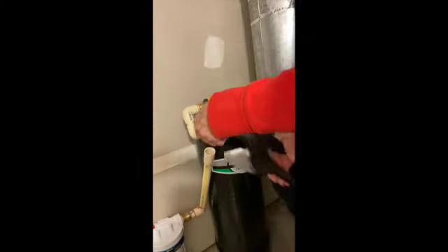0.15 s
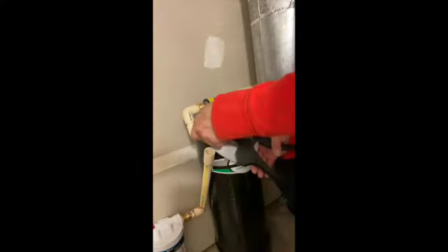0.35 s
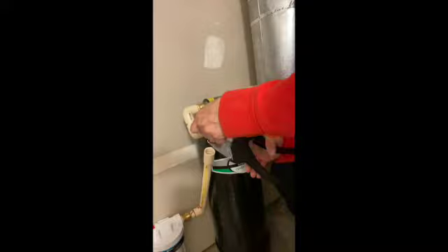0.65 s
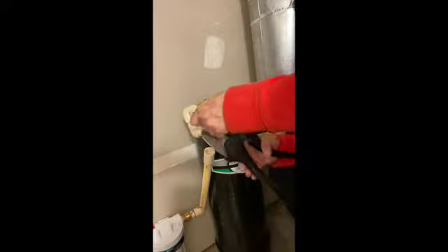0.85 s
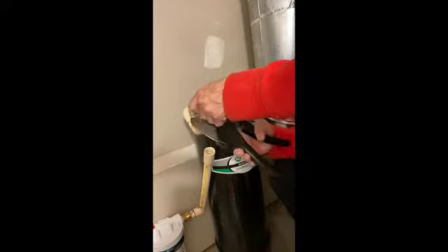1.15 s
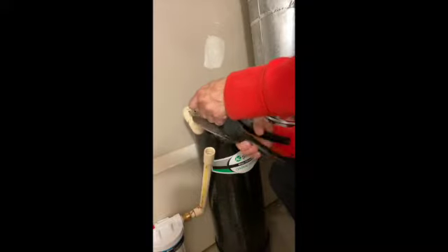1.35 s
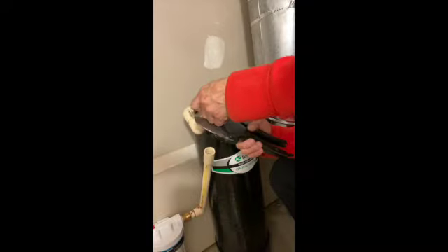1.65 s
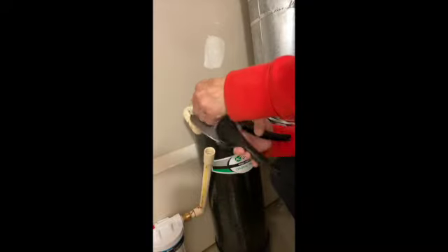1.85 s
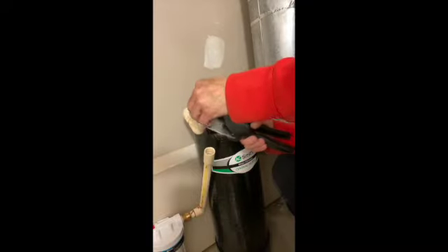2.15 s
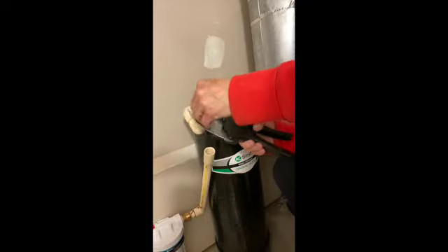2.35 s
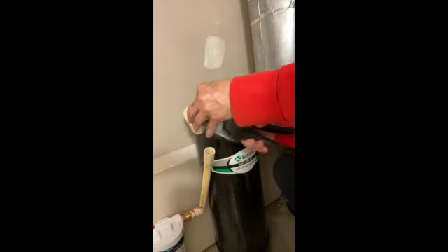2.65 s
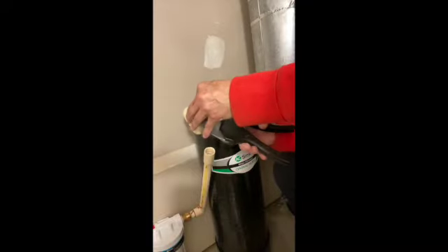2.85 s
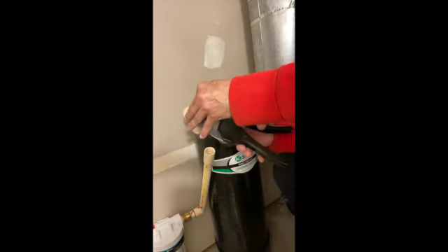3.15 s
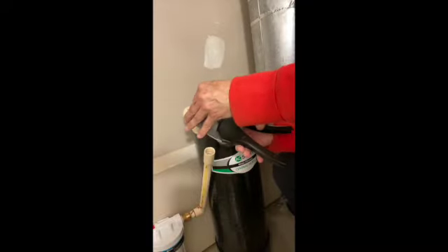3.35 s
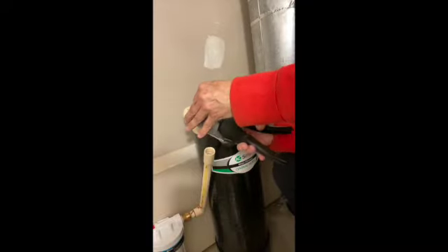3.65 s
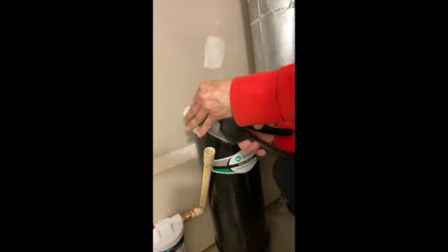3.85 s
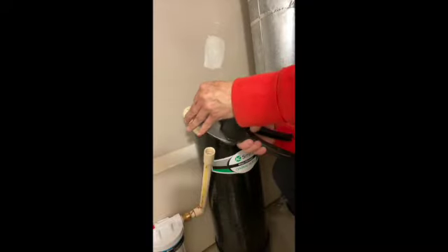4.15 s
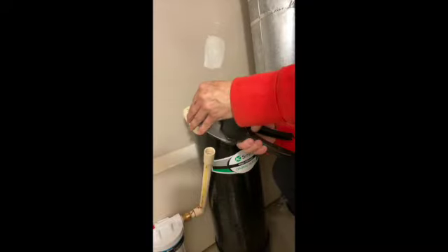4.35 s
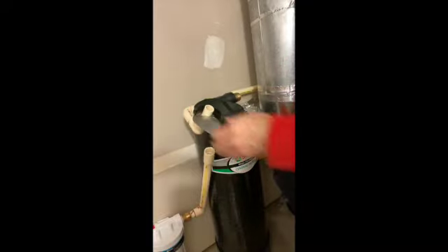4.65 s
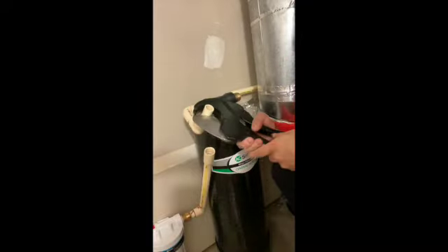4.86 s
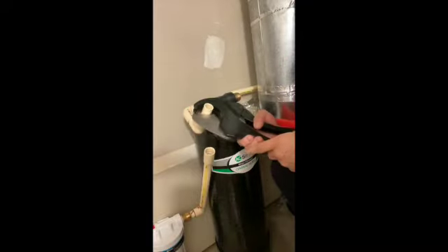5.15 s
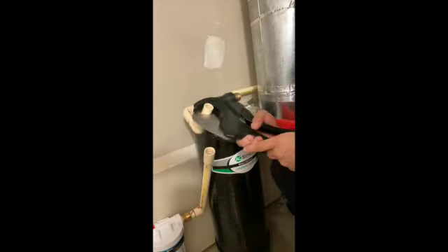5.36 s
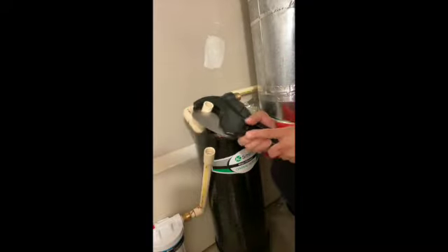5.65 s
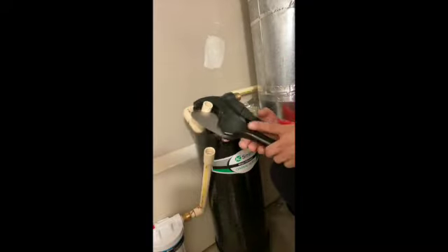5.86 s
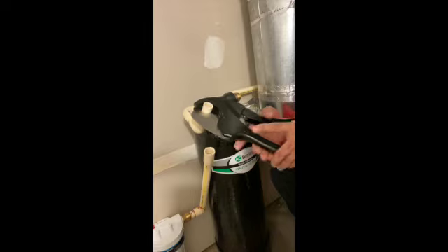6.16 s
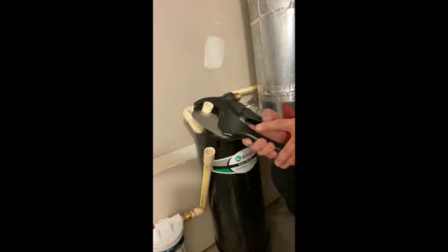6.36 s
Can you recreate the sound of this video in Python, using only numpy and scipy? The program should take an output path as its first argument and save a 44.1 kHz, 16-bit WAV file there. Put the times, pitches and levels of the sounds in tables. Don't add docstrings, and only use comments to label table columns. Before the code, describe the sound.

A close, dry stereo pickup in a small utility room, work slightly right, over very faint low mains hum, rumble and air. At about 0.37 s the tool clacks on the pipe and a soft low boom comes from the tank; tiny ticks follow. Light taps at 1.7 lead around a ratchet run: a light snap at 1.5, a strong one at 1.8, a duller one at 2.2 and a strong brighter one at 2.7, each a sharp steel crack with short ringing and slight hollow knock. Rustles and taps fill between. Around 3.3 the plastic gives a short, rough creak. Soft pats and nudges at 3.5-4.0, then near quiet, with faint palm slides from 4.6 to 5.2. A bright snap at 5.5 has a dry pop just after; a last, brightest snap at 5.95 follows a longer scraping drag. Rustle and small taps continue to 6.3.

```python
import sys
import numpy as np
from scipy import signal
from scipy.fft import rfft, irfft, next_fast_len
from scipy.io import wavfile
from scipy.ndimage import map_coordinates

SR = 44100
rng = np.random.default_rng(int(sys.argv[2]) if len(sys.argv) > 2 else 0)


def elevation(decibels):
    levels = np.asarray(decibels, float)
    return 10 ** (levels / 20)


def store_wav(level_fs):
    pcm = np.round(np.clip(np.atleast_2d(level_fs), -1, 1) * 32767)
    wavfile.write(sys.argv[1], SR, pcm.T.astype(np.int16))


N = 286650
TIME = np.arange(N) / SR

# (time [s], peak [dB], die-away by 60 dB [s], drag up the tooth [s],
# brightness as the grip tightens [dB per octave])
SNAPS = [
    (1.5129, -19, 0.092, 0.0043, -4),
    (1.788, -8.5, 0.07, 0.0091, -3),
    (2.1849, -18, 0.1, .009, -0.5),
    (2.7075, -8, 0.09, 0.015, 3.5),
    (5.5364, -13.5, 0.1, 0.015, 4),
    (5.9514, -10.5, 0.089, 0.029, 5),
]
# (frequency [Hz], level [dB])
SCUFF = [(3000, -27), (4300, -2), (5500, -2.5), (7500, 1), (9000, -2), (12000, -6.5), (14200, -6),
         (15700, -45)]


def unit(x):
    return x / np.sqrt(np.mean(x ** 2) + 1e-20)


def along(points, hz):
    f, v = np.transpose(points)
    return np.interp(np.log(hz + 1), np.log(f + 1), v)


def wobble(rate):
    knots = rng.standard_normal(int(N * rate / SR) + 4)
    return map_coordinates(knots, [np.arange(N) * rate / SR])


def filtered(x, response):
    m = next_fast_len(x.shape[-1] + 8192)
    gain = response(np.fft.rfftfreq(m, 1 / SR))
    gain = unit(np.abs(gain)) * np.exp(1j * np.angle(gain))
    return irfft(rfft(x, m) * gain, m)[..., :x.shape[-1]]


def body(modes):
    def response(f):
        total = 0
        for k, (hz, width, db) in enumerate(modes):
            total = total + (-1) ** k * elevation(db) * 1j * f * width / (hz * hz - f * f + 1j * f * width)
        return total
    return response


def shape(points):
    return lambda f: elevation(along(points, f))


def diffuse(spectrum):
    # (frequency [Hz], likeness of the ports [0 to 1])
    likeness = [(100, 0.94), (400, 0.54), (1500, 0.15), (8000, 0.91)]
    m = next_fast_len(N)
    f = np.fft.rfftfreq(m, 1 / SR)
    angle = np.arccos(np.clip(along(likeness, f), -1, 1)) / 2
    noise = rfft(rng.standard_normal((2, m))) * elevation(along(spectrum, f))
    mid, side = irfft(noise * [np.cos(angle), np.sin(angle)], m)[:, :N]
    return unit(np.array([mid + side, mid - side]))


def strokes(rows, rise, fall):
    power = 0
    for s, hold, db in rows:
        before, after = np.maximum(s - TIME, 0), np.maximum(TIME - s - hold, 0)
        power = power + elevation(2 * (db - rise * before - fall * after))
    return np.sqrt(power)


def rattle(t60, roughness_db, apart):
    t = np.arange(SR // 4) / SR
    lumps = np.interp(t, np.arange(250) / 1000, rng.standard_normal(250)) * np.minimum(t / .004, 1)
    both, own = rng.standard_normal((2, len(t)))
    force = both + apart * own * [[1], [-1]]
    return force * elevation(roughness_db * lumps - 60 * t / np.clip(t60, .02, .4))


def ringing(modes, rise):
    t = np.arange(SR // 2) / SR
    total = 0
    for hz, db, t60 in modes:
        phase = 0.25 * rng.standard_normal((2, 1))
        level = elevation(db - 60 * t / t60 + 2.5 * np.cos(hz / 40 * t))
        total = total + level * np.sin(2 * np.pi * hz * t + phase)
    return (1 - np.exp(-t / rise)) * total


def add(out, at, piece):
    out[..., at:at + piece.shape[-1]] += piece


def touches(rows, treble_db, hollow_db, blade_db):
    # (frequency [Hz], width [Hz], level [dB])
    blade_lines = [(1740, 15, -7), (2930, 24, -3), (3360, 11, -4), (4200, 18, -4)]
    # (frequency [Hz], width [Hz], level [dB])
    hollow = [(298, 9, 4.5), (570, 190, -2.5), (850, 130, -1.5), (1130, 390, -7)]
    out, scuff, pipe = np.zeros((3, 2, N + SR))
    soft = 1 - np.exp(-np.arange(SR // 4) / SR / 0.0013)
    for s, db, hz, t60 in rows:
        at = round(s * SR)
        modes = body([(1550, 350, -7), (hz, 260, 0), (4300, 1400, -12)])
        lines = body([(c, w, g + blade_db + rng.normal(0, 4)) for c, w, g in blade_lines])

        def wall(f):
            return (modes(f) + lines(f)) / (1 + 1j * f / (3.0 * hz)) ** 2 / (1 + (f / 5000) ** 8)

        force = soft * rattle(t60, roughness_db=0.0, apart=0.74)
        add(out, at, elevation(db - 10.0) * filtered(force, wall))
        hiss = soft * rattle(1.2 * t60, roughness_db=2.0, apart=.1)
        add(scuff, at, elevation(db + treble_db - 3.0) * hiss)
        knock = soft * rattle(0.77 * t60, roughness_db=3, apart=.2)
        add(pipe, at, elevation(db + hollow_db + 2.0) * knock)
    return (out + filtered(scuff, shape(SCUFF)) + filtered(pipe, body(hollow)))[:, :N]


def thumps(rows, excess):
    out, t = np.zeros(N + SR), np.arange(SR // 2) / SR
    for s, db, hz, t60, rise in rows:
        turns = hz * (t + excess * .006 * (1 - np.exp(-t / 0.0053)))
        swell = (1 - np.exp(-t / rise)) ** 2
        add(out, round(s * SR), elevation(db - 60 * t / t60) * swell * np.sin(2 * np.pi * turns))
    return out[:N]


def swings(rows):
    total = 0
    for s, db, hz, half in rows:
        t = TIME - s
        total = total + elevation(db) * np.exp(-.5 * (t / half) ** 2) * np.sin(2 * np.pi * hz * t)
    return total


def mains_hum():
    # (frequency [Hz], level [dB])
    hum_lines = [(120, -0.5), (240, -31)]
    # (time [s], hum level [dB])
    load = [(0, -74), (.25, -73.5), (.45, -67.5), (1.2, -72.5), (2.6, -64), (3.1, -69), (4.7, -66.5),
            (5.6, -67.5), (6.2, -65), (6.5, -64)]
    s, db = np.transpose(load)
    hum = 0
    for hz, line_db in hum_lines:
        level = elevation(line_db + 2.5 + 1.8 * wobble(6.2))
        hum = hum + level * np.sin(2 * np.pi * hz * TIME + 0.6 * wobble(3.3))
    return elevation(np.interp(TIME, s, db)) * hum


def floor_rumble():
    # (start [s], hold [s], level [dB])
    shifts = [
        (0, 0.011, -71),
        (.42, 0.034, -88),
        (.6, 0.26, -76.5),
        (1.9, 0.93, -72.5),
        (3.9, 1, -74.5),
        (5.5, 0.038, -67.5),
        (6.17, 0.041, -67.5),
    ]
    # (frequency [Hz], level [dB per Hz])
    lows = [(12, -41), (20, -8.5), (92, 0), (123, -16.5), (137, -4), (146, -16.5), (250, -29), (330, -72)]
    level = strokes(shifts, rise=20, fall=64) + elevation(-77.5)
    return level * elevation(2.2 * wobble(4.1)) * diffuse(lows)


def end_fade():
    return elevation(-164.5 * np.maximum(TIME - 6.41, 0))


def room_air():
    # (frequency [Hz], level [dB])
    air_colour = [(110, -21), (165, 1.5), (700, -10), (1300, -16.5), (2200, -12.5), (6000, -22.5),
                  (13500, -22.5), (15500, -46)]
    return elevation(-82) * diffuse(air_colour)


def sleeve():
    # (start [s], hold [s], rub [dB], swish over the rub [dB])
    moves = [(0, 0.083, -87.5, -1), (1.57, 0.12, -80, 5), (1.84, 0.089, -75.5, 8), (2.047, 0.22, -70, -10),
             (2.434, 0.014, -75, 1.5), (2.556, 0.025, -65, -5), (2.692, 0.094, -83, -7),
             (3.6, 0.0111, -84, -15.5), (3.894, 0.0124, -72.5, -5.5), (4.05, 0.32, -105, -3),
             (4.421, 0.065, -88.5, 11.5), (4.589, 0.12, -88, -5), (4.794, 0.22, -76.5, -0.5),
             (5.122, 0.12, -89.5, -4), (5.329, 0.0089, -66, -11), (5.45, 0.28, -84.5, 8),
             (5.776, 0.0093, -66, 2), (5.874, 0.069, -67, 1.5), (5.997, 0.26, -70.5, -2.5),
             (6.246, 0.036, -86, -8)]
    # (frequency [Hz], level [dB per Hz])
    cloth = [(250, -15.5), (500, -1.5), (1400, -3.5), (3000, -1.5), (5500, -7.5), (8000, -43)]
    rise, fall = 410, 430
    grain = elevation(1.5 * wobble(25) + 3 * wobble(400))
    rub = strokes([row[:3] for row in moves], rise, fall) + elevation(-99)
    swish = strokes([(s, hold, db + over) for s, hold, db, over in moves], rise, fall) + elevation(-95.5)
    soft_rub = rub * filtered(unit(grain * rng.standard_normal(N)), shape(cloth))
    bright_swish = swish * elevation(1.4 * wobble(23)) * filtered(rng.standard_normal(N), shape(SCUFF))
    return soft_rub + bright_swish


def jaw_taps():
    # (time [s], peak [dB], loudest wall resonance [Hz], die-away by 60 dB [s])
    taps = [(.365, -32, 2630, 0.11), (.7172, -45.5, 3400, 0.029), (1.415, -78, 6300, 0.048),
            (1.659, -48, 2500, 0.23), (1.678, -53, 2540, 0.041), (1.7225, -28, 1650, 0.034),
            (1.7255, -27, 2940, 0.09), (2.023, -47, 1470, 0.126), (2.0298, -40.5, 2510, 0.094),
            (2.067, -41, 2430, 0.11), (2.098, -37, 2940, 0.082), (2.4647, -42.5, 2490, 0.073),
            (2.5553, -40.5, 2356, 0.19), (2.682, -36.5, 2597, 0.3), (3.9505, -36.5, 2440, 0.095),
            (4.039, -65, 2200, 0.0426), (5.3233, -47.5, 2320, 0.14), (5.592, -32, 2200, .06),
            (6.2093, -35, 2276, 0.073), (6.217, -37.5, 2680, 0.055), (6.2744, -54.5, 1540, 0.071)]
    return touches(taps, treble_db=-20, hollow_db=-21, blade_db=-13)


def chimes():
    # (time [s], peak [dB], pitch [Hz], die-away by 60 dB [s])
    tones = [(0.366, -51, 1694, 0.12), (.367, -69, 2960, .33), (.367, -61, 4200, 0.24),
             (.368, -58, 880, 0.12), (.368, -62, 680, .12), (0.389, -65, 253, 0.26), (.400, -68, 332, 0.28),
             (0.389, -64.5, 460, 0.16), (0.611, -79, 4500, 0.12), (.717, -68, 3460, 0.16),
             (.717, -75, 1800, 0.3), (0.721, -66, 5250, 0.14), (.840, -81.5, 1810, 0.56),
             (.920, -78, 1768, 0.37), (4.462, -78, 3600, .15), (5.222, -71, 2120, .1),
             (2.466, -54.5, 2450, .07), (2.627, -52, 2450, 0.09), (1.131, -82, 3450, .23),
             (1.414, -72, 1750, 0.34), (1.413, -70, 2930, .2), (1.414, -68.5, 4080, 0.3),
             (1.515, -63, 3470, .3), (1.515, -57.5, 4200, 0.37), (1.79, -19, 1540, 0.026),
             (2.030, -54.5, 2450, 0.23), (2.067, -51.5, 2450, 0.15), (2.1849, -23.5, 1629, 0.034),
             (2.310, -71.5, 1567, 0.058), (3.085, -42.5, 2860, 0.045), (3.097, -47.5, 2910, 0.062),
             (3.330, -46.5, 1584, 0.089), (3.954, -53, 2394, .1), (5.545, -36, 3990, 0.16),
             (5.600, -61.5, 2100, 0.38), (5.855, -57.5, 850, 0.058), (5.853, -59, 1720, 0.065)]
    out = np.zeros((2, N + SR))
    for s, db, hz, t60 in tones:
        add(out, round(s * SR), ringing([(hz, db, t60)], rise=0.0014))
    return out[:, :N]


def tank_boom():
    # (time [s], peak [dB], pitch [Hz], die-away by 60 dB [s], rise [s])
    booms = [
        (0.381, -32, 48.3, 0.49, 0.033),
        (.377, -33.5, 78.5, 0.16, 0.0054),
        (0.417, -31, 150, 0.11, 0.01),
    ]
    return thumps(booms, excess=0.46)


def steel_ticks():
    # (time [s], peak [dB], loudest resonance [Hz], die-away by 60 dB [s])
    ticks = [(.6187, -87, 1393, 0.074), (.988, -56.5, 2300, 0.045), (1.002, -58, 2500, 0.072),
             (1.4121, -56, 2908, 0.23), (1.501, -45, 2860, 0.029), (1.768, -36.5, 2580, 0.13),
             (2.139, -40, 2040, 0.038), (2.144, -31.5, 2870, 0.056), (2.174, -32, 2300, 0.052),
             (2.6, -48, 2903, 0.025), (4.4091, -64.5, 2350, 0.081), (4.412, -60.5, 5210, 0.059),
             (4.46, -69.5, 3590, 0.18), (5.7678, -52.5, 2670, 0.17), (6.1843, -51.5, 2183, 0.147),
             (6.2, -58, 2410, .08)]
    return touches(ticks, treble_db=-12, hollow_db=-27.5, blade_db=-2)


def knuckle_knocks():
    # (time [s], peak [dB], loudest resonance [Hz], die-away by 60 dB [s])
    knocks = [(.7183, -47.5, 1540, 0.11), (.9201, -57.5, 1720, 0.16), (1.1307, -69.5, 3440, 0.086),
              (1.9815, -50, 1540, 0.1), (2.3792, -54.5, 2890, 0.16), (3.335, -53, 1320, 0.3),
              (3.8712, -47.5, 2200, 0.1), (5.7384, -61, 1440, 0.066), (5.8541, -60, 1750, 0.06),
              (6.048, -62.5, 3700, 0.19), (1.993, -54, 1100, 0.043), (2.003, -55.5, 987, 0.048)]
    return touches(knocks, treble_db=-17.5, hollow_db=-7, blade_db=-12.5)


def fingertip_pats():
    # (time [s], peak [dB], loudest resonance [Hz], die-away by 60 dB [s])
    pats = [(.83, -94, 1835, 0.44), (2.5027, -57, 2320, 0.1), (2.6025, -40, 2380, 0.037),
            (2.625, -43, 2494, 0.12), (3.5423, -56, 1474, 0.15), (3.5718, -49, 2590, 0.069),
            (3.7795, -44, 2597, 0.075), (3.795, -45.5, 2300, 0.12), (3.83, -56, 1697, 0.15),
            (5.2218, -57, 2050, 0.11), (2.079, -51, 2450, 0.066), (2.109, -46.5, 2700, 0.037),
            (2.036, -44.5, 2500, .06)]
    return touches(pats, treble_db=-32.5, hollow_db=-22, blade_db=-16)


def ratchet_snaps():
    # (treble [dB], drag under the snap [dB], clang [dB])
    strikes = [(-1.5, -17.5, -16), (-1, -18, -14.5), (1.5, -19, -11.5), (-2, -17, -13.5), (0.5, -14.5, -19),
               (-1.5, -15.5, -12.5)]
    hollow_levels = [-4, 0, 4.5, -0.5, 3, 4]
    crack_levels = [-5.5, -7, -5.5, -5, -2, -6]
    # (frequency [Hz], width [Hz], level [dB])
    clangs = [
        [(1540, 89, -5.5), (1750, 60, 0), (2940, 94, 0), (3450, 28, -6.5), (3730, 100, -4.5)],
        [(1630, 70, -1), (2134, 33, -3), (2450, 44, -1), (2870, 36, 0), (3800, 91, -0.5), (7190, 65, -5)],
        [(1720, 72, 5), (2200, 38, -1), (3330, 53, -6), (3600, 54, -36), (4600, 60, 4)],
        [(2162, 70, 0.5), (2420, 60, -1), (2750, 89, 2), (2910, 71, -3.5), (3630, 60, -3.5), (4500, 58, -7)],
        [(2440, 77, 0), (3350, 93.3, 5.5), (4040, 54, -9), (4140, 32, -4.5)],
        [(1540, 170, -5), (2280, 80, -6.5), (2686, 60, -5), (3560, 43, -2.5), (3720, 110, 0)],
    ]
    # (frequency [Hz], level [dB], t60 [s])
    blade_rings = [
        [(1722, -58.5, 0.49), (2895, -63, .5), (5200, -55.5, 0.34), (6450, -54, .3), (7000, -60, 0.46),
         (7550, -59, .4), (7990, -58.5, .4), (9291, -62.5, 0.35), (10400, -63, .45)],
        [(1710, -56, 0.4), (3120, -51.5, .3), (7200, -42.5, .22), (8700, -52, .2)],
        [(1722, -56, 0.42), (2896, -52, 0.6), (4732, -65, 0.38), (5190, -54, 0.5), (6400, -48, 0.28),
         (8522, -60, 0.6), (9636, -58, 0.33), (10410, -61, 0.5)],
        [(1730, -53, 0.4), (2300, -53, 0.27), (2900, -57, 0.35), (4030, -54, 0.75), (5190, -52, 0.55),
         (5900, -46, .45), (6450, -52, 0.45), (9645, -61, 0.5)],
        [(3900, -54.5, .4), (4150, -65.5, .5), (4960, -59.5, 0.385), (6300, -48.5, 0.37), (7200, -57, .4),
         (9600, -58, 0.4)],
        [(4090, -62, 0.41), (5230, -50, 0.6), (6300, -52, .3), (6700, -40, .08), (7200, -50, .2)],
    ]
    # (frequency [Hz], width [Hz], level [dB])
    jaw_modes = [(1530, 220, -1), (2350, 420, -0.2), (3110, 450, 3), (3400, 260, -3.5), (3694, 320, 4.5),
                 (4210, 2700, -3.5)]
    # (frequency [Hz], width [Hz], level [dB])
    steel_modes = [(5110, 97, -1.5), (6300, 1500, -7), (7570, 840, 1), (8300, 2100, -1), (9100, 980, 0.5),
                   (9624, 190, -1.5), (10202, 200, 2.5), (10300, 510, -1), (11380, 380, 1),
                   (12450, 520, -1.5), (14700, 940, -2), (15000, 740, -10)]
    # (frequency [Hz], level [dB])
    steel_colour = [(3500, -30), (4800, -1), (7500, -3), (10000, -2.5), (13500, -1), (15300, -6.5),
                    (17000, -35)]
    # (frequency [Hz], width [Hz], level [dB])
    gripped_pipe = [(217, 90, -3.5), (390, 150, -0.5), (597, 47, 0), (805, 170, -0.5), (1050, 200, 0),
                    (1330, 260, 1.5)]
    out, steel, scuff = np.zeros((3, 2, N + SR))
    each = zip(SNAPS, strikes, hollow_levels, crack_levels, clangs, blade_rings)
    for snap, (treble_db, drag_db, clang_db), hollow_db, crack_db, clang, ring in each:
        s, db, t60, length, tilt_db = snap
        at, lead = round(s * SR), round(length * SR)
        rise = elevation(drag_db + np.linspace(-26, 0, lead)) * np.sqrt(np.linspace(0, 1, lead))
        drag = rise * rng.standard_normal((2, lead))
        force = np.hstack([drag, elevation(-9) * rattle(t60, roughness_db=0.0, apart=0.56)])
        jaws = body([(hz, w, g + tilt_db * np.log2(hz / 2600)) for hz, w, g in jaw_modes])
        jaw_sound = filtered(force, lambda f: jaws(f) / (1 + 1j * f / 6500) ** 2)
        add(out, at - lead, elevation(db) * jaw_sound)
        add(out, at, ringing([(hz, db + clang_db + g, 3.8 / w) for hz, w, g in clang], rise=0.001))
        add(steel, at, elevation(db + treble_db - 2.5) * rattle(0.87 * t60, roughness_db=3.5, apart=.1))
        add(scuff, at, elevation(db + crack_db) * rattle(0.022, roughness_db=-1.0, apart=0.032))
        knock = filtered(rattle(.6 * t60, roughness_db=3, apart=.3), body(gripped_pipe))
        add(out, at, elevation(db - 24 + hollow_db - 5.5) * knock)
        add(out, at, ringing(ring, rise=.001))
    out += filtered(steel, lambda f: body(steel_modes)(f) * shape(steel_colour)(f))
    return (out + filtered(scuff, shape(SCUFF)))[:, :N]


def snap_jolts():
    # (peak [dB], pitch [Hz])
    jolts = [(-48.5, 57.6), (-41.5, 64), (-43, 100), (-39, 36), (-40.5, 82.7), (-30, 88)]
    rows = [(snap[0], db, hz, 0.083, 0.0011) for snap, (db, hz) in zip(SNAPS, jolts)]
    return thumps(rows, excess=3)


def pipe_sways():
    # (middle [s], peak [dB], pitch [Hz], half length [s])
    sways = [
        (1.77, -50.5, 95, 0.012),
        (2.1, -56, 92, 0.055),
        (2.597, -63, 65.2, 0.044),
        (3.327, -46.5, 124, 0.017),
        (3.91, -54, 108.5, 0.011),
        (4.007, -46, 99.3, 0.017),
        (5.371, -43, 98.8, 0.016),
        (5.626, -51.5, 104, 0.015),
        (6.275, -56.5, 81, 0.022),
    ]
    return swings(sways)


def wall_pops():
    # (middle [s], peak [dB], pitch [Hz], half length [s])
    pops = [
        (1.9835, -53, 1400, 0.00132),
        (3.8735, -50, 1700, 0.002),
        (3.954, -51.5, 1546, 0.004),
        (5.5915, -29, 1560, 0.00062),
        (5.596, -41, 3376, 0.0024),
    ]
    return swings(pops)


def creak():
    # (start [s], hold [s], level [dB])
    bites = [
        (3.06, 0.046, -61.5),
        (3.083, 0.0043, -52.5),
        (3.098, 0.0052, -53),
        (3.253, 0.0043, -50),
        (3.26, 0.015, -42.5),
        (3.278, 0.012, -36.5),
        (3.293, 0.032, -34),
        (3.333, 0.013, -39),
    ]
    # (frequency [Hz], width [Hz], level [dB])
    wall_modes = [(1620, 226, -11), (2300, 310, -13.5), (2902, 150, 0.5), (3384, 160, -8),
                  (3670, 260, -10.5), (4550, 759, -17), (6180, 670, -13)]
    # (frequency [Hz], width [Hz], level [dB])
    pared_pipe = [(303, 34, -2), (515, 44, 1), (880, 92, 0.5), (1057, 110, -1.5), (1319, 143, -3)]
    treble_db, hollow_db = -11.5, 3
    effort = strokes(bites, rise=3500, fall=800)
    count = np.floor(122.8 * (TIME - 3.3172) + .03 * wobble(40))
    slips = (np.diff(count, prepend=0) > 0) * elevation(0.5 * (-1) ** count + rng.standard_normal(N))
    puffs = unit(signal.lfilter([1], [1, -np.exp(-1 / (.004 * SR))], slips))
    noise = rng.standard_normal(N) + 0.42 * rng.standard_normal(N) * [[1], [-1]]
    scrape = unit((puffs + .5) * noise)
    kicks = filtered(effort * unit(1.3 * unit(slips) + scrape), body(wall_modes))

    def hiss_and_hollow(f):
        return unit(shape(SCUFF)(f)) + elevation(hollow_db - treble_db) * body(pared_pipe)(f)

    return kicks + elevation(treble_db + 1.5) * filtered(effort * scrape, hiss_and_hollow)


def palm():
    # (start [s], hold [s], level [dB], pitch over the air at rest [ratio])
    slides = [
        (4.617, 0.11, -83, 1.16),
        (4.693, 0.071, -78.5, 0.96),
        (4.831, 0.072, -71.5, 0.98),
        (4.955, 0.073, -83.5, 0.977),
        (5.192, 0.048, -82, 1.58),
    ]
    # (frequency [Hz], width [Hz], level [dB])
    tube = [(355.6, 40, -6), (685, 110, -13), (1038.4, 108, -7.5), (1400, 40, 3), (1760, 91, -9.5)]
    skin = elevation(1.06 * wobble(16)) * rng.standard_normal(N)
    total = 0
    for *row, pitch in slides:
        air = filtered(skin, lambda f: body(tube)(f / pitch))
        total = total + strokes([row], rise=174, fall=400) * air
    return total


def ports(pair):
    # (frequency [Hz], level [dB])
    difference = [(900, -7), (1800, -7), (2800, 2), (4700, 1.5), (5500, -4), (6300, -4), (7600, 5),
                  (9800, 0)]
    mid, side = (pair[0] + pair[1]) / 2, filtered((pair[0] - pair[1]) / 2, shape(difference))
    return np.array([mid + side, mid - side])


def far_port(x):
    # (frequency [Hz], phase [radians])
    bend = [(40, -.05), (1000, -.4), (1750, .25), (3400, 1), (5000, .55), (5600, .22), (6200, .45),
            (9000, -.1)]
    lag = 1 / 10600
    return filtered(x, lambda f: np.exp(-2j * np.pi * f * lag + 1j * along(bend, f)))


def room(x):
    # (frequency [Hz], die-away by 60 dB [s])
    decay = [(300, .3), (3000, .28), (8000, .2), (15000, .13)]
    hz, t, z = signal.stft(rng.standard_normal((2, SR // 2)), SR, nperseg=256)
    dying = z * elevation(-60 * t / along(decay, hz)[:, None])
    common, own = signal.istft(dying, SR, nperseg=256)[1]
    left = np.pad(common, (4, 0))[:len(own)] + 1.0 * own
    tail = np.array([left, common - 0.067 * own]) / np.linalg.norm(common)
    return signal.fftconvolve(np.pad(x, (130, 0))[None], tail, axes=1)[:, :N]


def scene():
    contacts = jaw_taps() + chimes() + steel_ticks() + knuckle_knocks() + fingertip_pats()
    work = ports(contacts + ratchet_snaps() + creak()) + sleeve() + wall_pops() + palm()
    machines = end_fade() * (mains_hum() + floor_rumble()) + room_air()
    bumps = tank_boom() + snap_jolts() + pipe_sways()
    left, right = elevation([[2.9], [1.8]]) * work + machines + bumps
    return np.array([far_port(left), right]) + elevation(-21.5) * room(work[1])


def top_cut(x):
    return signal.sosfilt(signal.butter(12, 16960, fs=SR, output="sos"), x)


def record(dry):
    soft = dry / (1 + np.abs(dry / .95) ** 4) ** .25
    m = next_fast_len(N)
    low_pass = 1 / (1 + (np.fft.rfftfreq(m, 1 / SR) / 16700) ** 40)
    return top_cut(irfft(rfft(soft, m) * low_pass, m)[:, :N])


dry = scene()
out = record(dry)
store_wav(out)
```